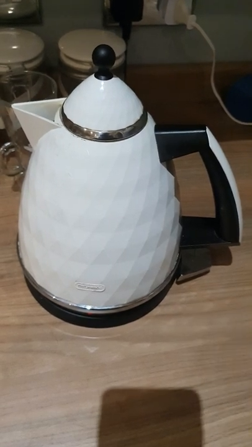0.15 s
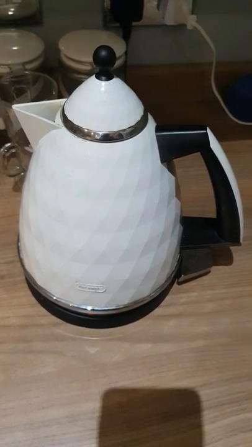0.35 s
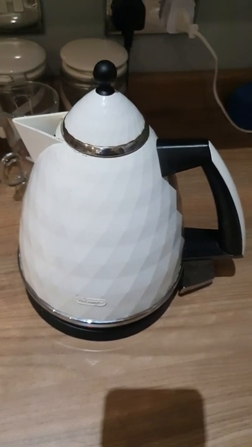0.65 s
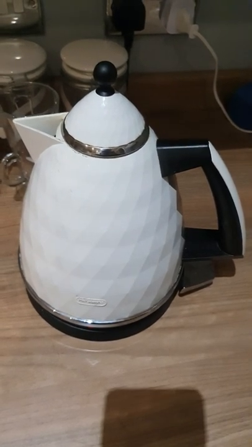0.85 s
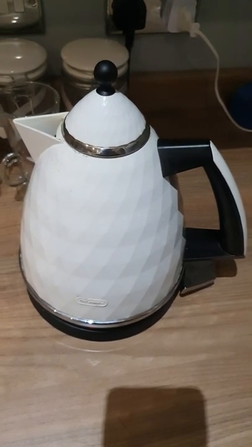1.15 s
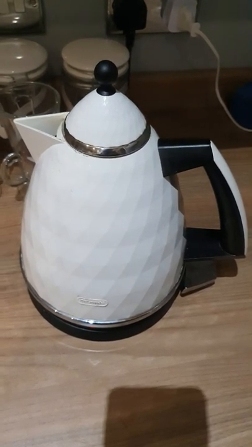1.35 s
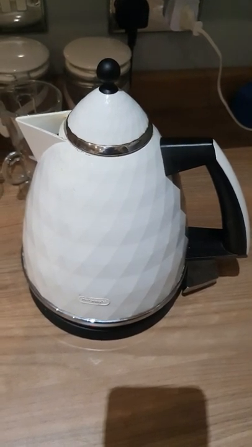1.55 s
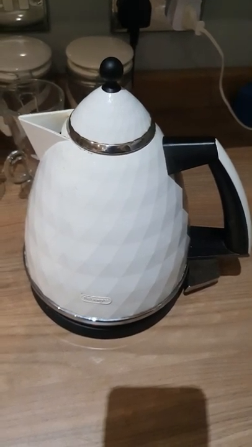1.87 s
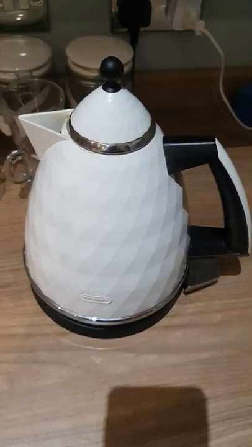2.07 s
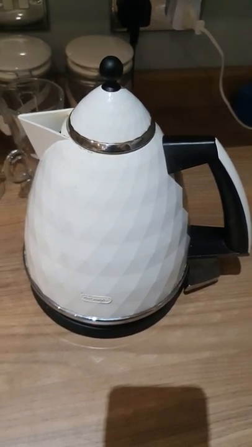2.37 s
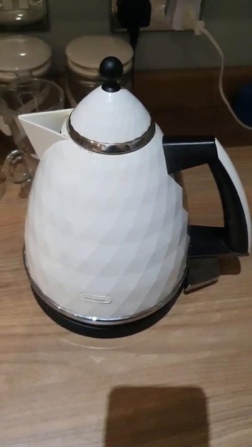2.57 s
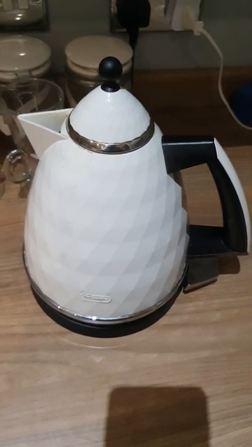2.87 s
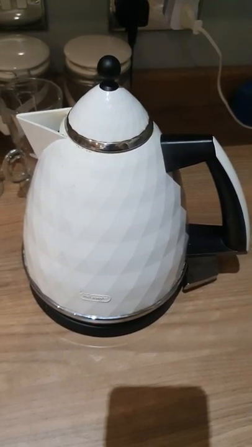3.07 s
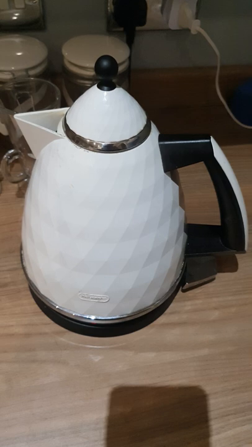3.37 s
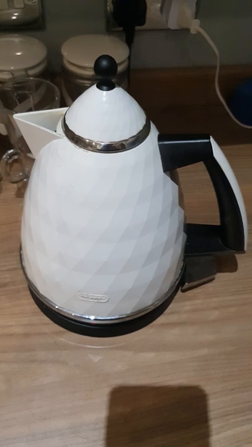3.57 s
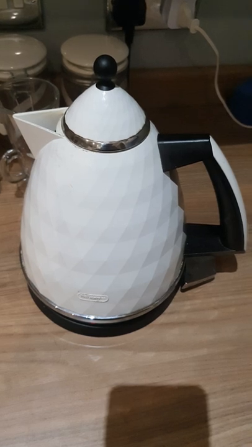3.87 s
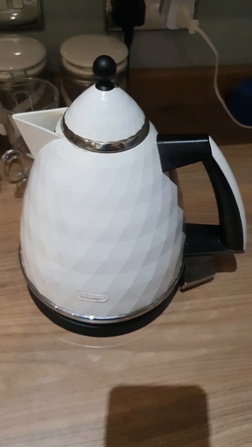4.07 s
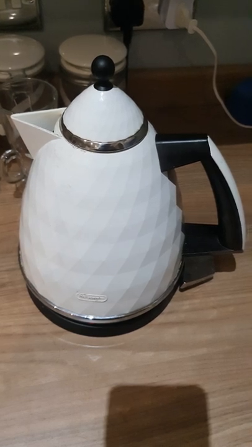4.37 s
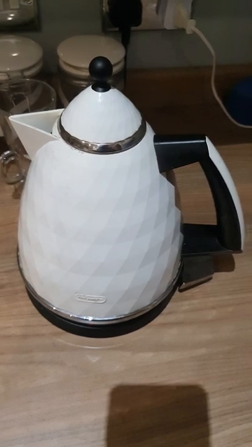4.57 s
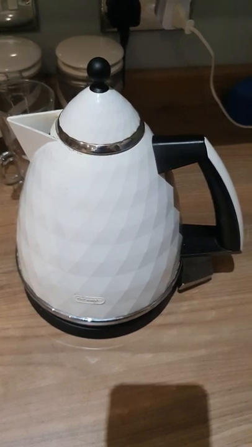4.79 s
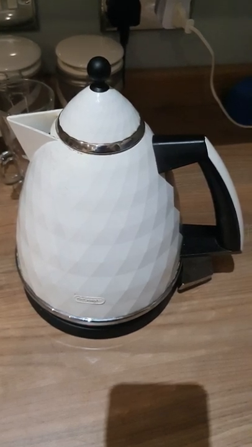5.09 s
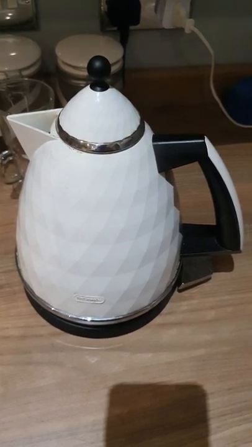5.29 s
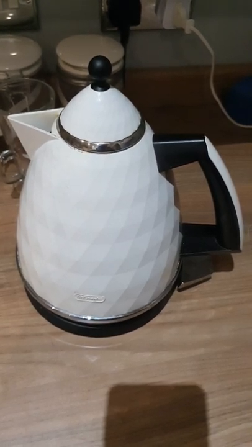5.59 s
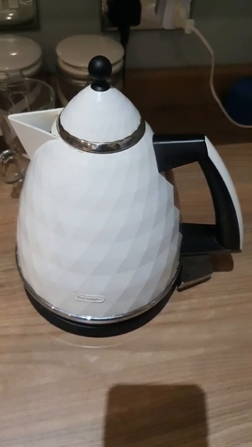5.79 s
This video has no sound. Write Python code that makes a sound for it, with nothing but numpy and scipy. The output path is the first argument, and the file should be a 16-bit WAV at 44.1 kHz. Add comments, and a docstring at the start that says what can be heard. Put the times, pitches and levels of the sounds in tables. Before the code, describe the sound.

An electric kettle warming water on a wooden counter, picked up very close by a phone, mostly centred and dry, lasting about six seconds. From 0 to 0.6 s the sound is thin and bright: a hissy, grainy rushing with little bass. At 0.62 s it switches abruptly, with a tiny dip, to a full, dark, muffled rumble that continues to the end. Its core is a wavering deep boom near 115 Hz, fluttering roughly and surging unevenly, with sudden drops around 1.2, 2.05, 3.2 and 5.15 s and strong bursts near 4.4 and 5.2 s. Above it sits a dense, hollow bubbling roar around 250 to 400 Hz, rising slightly near 5.5 s. Faint details lie far underneath: a soft breathy puff at 2.9 s, delicate fizz flurries, clearest near 2.9 and 4.4 s, and tiny high ticks between 2.2 and 5.4 s. It never reaches a full boil.

```python
"""Steam bubbles collapse on the hot base of an electric kettle: random impulses ring the modes of shell, water
and wooden counter, heard at the two ports of a phone held close above. One deep mode booms as a wavering sine.
Banded impulses make a fine fizz, swells of band noise make soft hisses, damped sines make ticks, and steady
noise is microphone hiss. After a moment the phone switches from a thin, bright colour to a full, dark one."""
import sys
import numpy as np
from scipy import signal
from scipy.fft import rfft, irfft, next_fast_len
from scipy.io import wavfile
from scipy.ndimage import uniform_filter1d

SR = 44100
rng = np.random.default_rng(int(sys.argv[2]) if len(sys.argv) > 2 else 0)


def put_to_file(sound):
    """Save the sound as 16-bit audio at rate SR, in the file named by the first command-line argument."""
    columns = np.atleast_2d(sound).T  # one column per channel
    safe = np.clip(columns, -1, 1)
    whole_steps = np.round(safe * 32767)
    wavfile.write(sys.argv[1], SR, whole_steps.astype(np.int16))


N = 261954
TIME_S = np.arange(N) / SR
SIZE = next_fast_len(N + SR // 2)  # padded FFT length
HZ = np.maximum(np.arange(SIZE // 2 + 1) * SR / SIZE, 1)


def undb(db):
    """Gain of a level in dB."""
    return 10 ** (np.asarray(db) / 20)


def level(x, db):
    """Scale to an rms level, taken over all channels together."""
    return x * undb(db) / np.sqrt(np.mean(x ** 2))


def along(hz, values):
    """Points joined on a log-frequency axis."""
    return np.interp(np.log(HZ), np.log(hz), values)


def over_time(table):
    """Points of a two-column table joined in time."""
    return np.interp(TIME_S, *np.transpose(table))


def colour(x, gain):
    """Weight the spectrum."""
    return irfft(rfft(x, SIZE) * gain, SIZE)[..., :N]


def sides(pan_db):
    """Left and right gains from left minus right in dB."""
    return undb(np.array([pan_db, -pan_db]) / 2)


def swell(middle_s, length_s, edge):
    """Bell in time; a higher edge exponent gives a flatter top and steeper flanks."""
    return np.exp(-np.abs(2 * (TIME_S - middle_s) / length_s) ** edge)


def walk(rate_hz):
    """Random levels held 1 / rate_hz and smoothed twice; unit spread."""
    hold = max(int(SR / rate_hz), 1)
    steps = rng.standard_normal(N)[np.arange(N) // hold]
    smooth = uniform_filter1d(uniform_filter1d(steps, hold), hold)
    return smooth / smooth.std()


def collapses(rate_hz, scatter_db):
    """Two unrelated swarms of bubble implosions at random instants, a few much stronger than the rest."""
    when, sign, size = rng.random((3, 2, N))
    strength = undb(-scatter_db * np.log(1 - size))
    return (when < rate_hz / SR) * np.sign(sign - .5) * strength


# microphone hiss spectrum: (frequency [Hz], relative level [dB], left minus right [dB])
HISS_SPECTRUM = [(5000, -10.5, 1.5), (8060, -6, -2), (9500, -3, 11.5), (10000, -3.5, 8), (11300, -1.5, 3.5),
                 (11900, -3.5, 0.5), (13500, -3, 1.5), (15700, -5, 0)]
HISS_RMS_DB = -76


def hiss():
    """Microphone noise: each port has its own smooth noise."""
    hz, db, pan_db = np.transpose(HISS_SPECTRUM)
    noise = rng.standard_normal((2, N)) * undb(.7 * walk(13))
    return level(colour(noise, undb(along(hz, db)) * sides(along(hz, pan_db))), HISS_RMS_DB)


# ticks of the warming shell: (time [s], starting level [dB], left minus right [dB])
SHELL_TICKS = [(2.2294, -52, -8), (2.4509, -58, -11), (3.1022, -58, -10), (3.3763, -61, 1),
               (3.4814, -62, 8), (3.707, -58, -3.0), (5.0804, -59, -1.5), (5.3792, -57, -6)]
TICK_HZ, TICK_T60_S, TICK_SAMPLES = 6400, .012, 2048


def ticks():
    """Each tick of the warming shell is a short, exponentially damped sine."""
    out = np.zeros((2, N + TICK_SAMPLES))
    t = np.arange(TICK_SAMPLES) / SR
    ring = undb(-60 * t / TICK_T60_S) * np.sin(2 * np.pi * TICK_HZ * t)
    for s, db, pan_db in SHELL_TICKS:
        start = int(s * SR)
        out[:, start:start + TICK_SAMPLES] += undb(db) * sides(pan_db)[:, None] * ring
    return out[:, :N]


# brief soft hisses, mostly on the right: (middle [s], length [s], centre [Hz], width [Hz],
# noise level before swell [dB], left minus right [dB])
SOFT_HISSES = [(2.9, 0.094, 1770, 1800, -50, -14), (2.964, .11, 12350, 4600, -75, -13),
               (4.439, .29, 4900, 900, -66.5, -13), (4.46, 0.27, 13600, 3200, -84, -8.5)]
PUFF_EDGE = 2.2


def puffs():
    """Each hiss is a soft, ragged swell of noise in one band."""
    out = 0
    for s, length_s, hz, width_hz, db, pan_db in SOFT_HISSES:
        band = 1 / (1 + (2 * (HZ - hz) / width_hz) ** 4)
        air = level(colour(rng.standard_normal((2, N)), band), db)
        ragged = undb(1.7 * walk(60)) * swell(s, length_s, PUFF_EDGE)
        out = out + air * ragged * sides(pan_db)[:, None]
    return out


# fizz spectrum: (frequency [Hz], relative level [dB])
FIZZ_SPECTRUM = [(3000, -23.5), (4200, -6.5), (4900, -3.5), (5600, -9), (6600, -2), (7100, -8),
                 (7800, -27.5), (9000, -39)]
# flurries of fizz: (middle [s], length [s], level [dB])
FIZZ_FLURRIES = [(.8, 0.44, -75), (1.73, .12, -71), (2.24, 0.065, -74), (2.577, 0.067, -69.5),
                 (2.73, .07, -71), (2.933, 0.19, -64), (3.1, 0.044, -67), (3.706, 0.061, -71),
                 (4.36, .14, -62), (4.5, .13, -60.5), (4.734, 0.094, -69), (5.083, .07, -70),
                 (5.39, .07, -74.5), (5.726, .1, -72.5)]
FIZZ_START_DB, FIZZ_FADE_DB_PER_S = -74.5, 3.5  # between flurries
FLURRY_EDGE, FIZZ_PAN_DB = 2.4, -5


def fizz():
    """The smallest bubbles fizz thinly and thin out as the water warms; short flurries of fizz rise above them."""
    spray = level(colour(collapses(12000, 1.5), undb(along(*np.transpose(FIZZ_SPECTRUM)))), 0)
    gain = undb(FIZZ_START_DB - FIZZ_FADE_DB_PER_S * TIME_S + 1.6 * walk(12))
    for s, length_s, db in FIZZ_FLURRIES:
        gain = gain + undb(db) * swell(s, length_s, FLURRY_EDGE)
    return spray * gain * undb(1.1 * walk(30)) * sides(FIZZ_PAN_DB)[:, None]


# deep mode of base and counter, long surges that collapse suddenly: (time [s], level [dB])
BOOM_LEVEL = [(0, -20.5), (.2, -28), (.3, -19), (.58, -27), (.7, -20), (.8, -30.5), (1.151, -20.5),
              (1.21, -32), (1.57, -20.5), (2.0, -22.5), (2.06, -42.5), (2.3, -27), (2.88, -21), (3.14, -22),
              (3.21, -34), (3.95, -24), (4.3, -33), (4.39, -17), (4.49, -33), (4.58, -20.5), (4.8, -21),
              (5.16, -47), (5.211, -18), (5.4, -30), (5.94, -24.5)]
BOOM_HZ, BOOM_WANDER_HZ, BOOM_STRAY_HZ_PER_DB, BOOM_JITTER_HZ = 115.77, 1.53, 0.15, 4.07
BOOM_FLUTTER, BOOM_CEILING = 0.83, 1.2  # random part of the push; size at which the push flattens out


def boom():
    """The swarm pushes the deep mode in and out of step, so it swells and wavers; weaker strays more."""
    db = over_time(BOOM_LEVEL)
    stray_hz = BOOM_WANDER_HZ + BOOM_STRAY_HZ_PER_DB * (db.max() - db)
    mode_hz = BOOM_HZ + stray_hz * walk(9) + BOOM_JITTER_HZ * walk(70)
    phase = 2 * np.pi * np.cumsum(mode_hz) / SR
    push = 1 + BOOM_FLUTTER * (walk(28) + 1j * walk(28))
    push = push / np.hypot(1, np.abs(push) / BOOM_CEILING)
    to_unit_rms = np.sqrt(2 / np.mean(np.abs(push) ** 2))
    return to_unit_rms * undb(db) * np.imag(push * np.exp(1j * phase))


# modes of shell, water and counter: (frequency [Hz], width [Hz], relative level [dB],
# left minus right [dB], unlikeness of ports [rad], right leads by [rad])
BODY_MODES = [(48.7, 35, -16.5, 0, 1.4, -0.7), (65.6, 38, -20.5, -1, .7, 0.3),
              (117.2, 36.7, -5.5, -2, .1, 0.1), (144.5, 37.4, -8, -1, .21, 0.23),
              (249.4, 40, -21, -4, 0.2, 0.46), (303.4, 24, -16.5, -3.5, 0.17, 0.04),
              (322, 18, -17.5, -6, 0.93, 1.5), (361.8, 29, -15.5, -2.5, 0.23, 0),
              (388.2, 32.7, -15, -3.5, 0.23, 0.5), (472.6, 93, -28.5, -5.5, .64, -0.3),
              (604, 94, -36, -2.5, 1.1, -0.9), (695, 75, -35, 0.5, 0.4, -1.5), (782, 63, -35, 0, 0.84, 0),
              (837, 95, -29.5, -5, 1.16, 2.1), (1045, 96, -34.5, -1.5, 1.18, -3),
              (1154, 75, -36.5, -7, 1.45, -2), (1257, 70, -39, -8, .95, -2.5),
              (1390, 35, -47.5, 3, 1.5, -2.15), (1480, 68, -45.5, 5.5, 1.1, -1),
              (1668, 160, -42.5, -3, 0.85, -1.34), (1978, 140, -46, 6, 1, -2.5),
              (2138, 140, -46, 8.5, 0.85, -1.5), (2332, 90, -46, 10, 1.4, 1), (2495, 95, -41, 5.5, 1, 1.1),
              (2750, 370, -49.5, 0.5, 1.37, -2), (3168, 66, -50, 6, 1.37, -3.5),
              (3497, 110, -53.5, 5, 1.37, -0.6), (4030, 170, -53, -2, 0.75, 2),
              (4350, 80, -62.5, -2, 0.91, -0.8), (4820, 150, -65, -1, 0.68, -1.5)]
# floor between the modes: (frequency [Hz], relative level [dB], left minus right [dB])
MODE_FLOOR = [(20, -60.5, -3), (40, -35, 0.5), (202, -31.5, 3), (600, -39.5, -2), (1210, -40.5, -1.5),
              (2380, -50, 7), (2670, -52.5, 5.5), (3300, -56.5, 2), (4470, -61, 0.5), (5500, -65, 1),
              (6700, -66, -1.5), (7700, -90, -2.5)]
# swarm strength as the water warms: (time [s], level [dB])
SWARM_HEAT = [(0, -3), (.6, 0.5), (1.2, 0.04), (2, -1), (2.6, -1), (3.3, -1), (4.2, -1.5), (5, -2),
              (5.94, -1)]
# hollow band of the air above the water: (time [s], level [dB])
HOLLOW_LEVEL = [(0, -32.5), (.7, -33), (1.17, -34), (1.3, -35), (4.6, -33.5), (5.15, -36), (5.3, -32.5),
                (5.52, -29), (5.6, -36), (5.94, -33.5)]
BODY_AND_HOLLOW_RMS_DB = -28.5  # full body and its hollow band, averaged together
HOLLOW_HZ, HOLLOW_WIDTH_HZ, HOLLOW_SURGE_DB = 350, 170, 1
PORTS_HZ = 250  # below this the ports feel nearly the same pressure


def body_power():
    """Power response at each port: every mode a steep-skirted resonance, plus the floor between."""
    hz, width_hz, db, pan_db, _, _ = np.transpose(BODY_MODES)
    gain = undb(db) * sides(pan_db * np.minimum(hz / PORTS_HZ, 1) ** 4)
    floor_hz, floor_db, floor_pan_db = np.transpose(MODE_FLOOR)
    power = (undb(along(floor_hz, floor_db)) * sides(along(floor_hz, floor_pan_db))) ** 2
    for k in range(len(hz)):
        # squared resonance keeps the valleys dark
        power = power + gain[:, k, None] ** 2 / (1 + (2 * (HZ - hz[k]) / width_hz[k]) ** 2) ** 2
    return power


def swarm_at_ports():
    """Swarm spectrum at both ports; the right mixes in a second swarm and a phase lead, by frequency."""
    heat_db = over_time(SWARM_HEAT) + 0.4 * walk(4.94) + .5 * walk(40)
    one, other = rfft(collapses(14000, 0.66) * undb(heat_db), SIZE)
    hz, _, _, _, unlike, lead = np.transpose(BODY_MODES)
    apart = np.minimum(HZ / PORTS_HZ, 1) ** 3
    unlike, lead = apart * along(hz, unlike), apart * along(hz, lead)
    right = np.cos(unlike) * np.exp(1j * lead) * one + np.sin(unlike) * other
    return np.array([one, right])


def rumble():
    """The swarm rings every mode; the hollow band is taken out and returned at its own moving level."""
    ringing = swarm_at_ports() * np.sqrt(body_power())
    band = 1 / (1 + (2 * (HZ - HOLLOW_HZ) / HOLLOW_WIDTH_HZ) ** 8)
    pair = irfft(np.array([ringing, ringing * band]), SIZE)[..., :N]
    body, hollow = level(pair, BODY_AND_HOLLOW_RMS_DB)
    hollow_db = over_time(HOLLOW_LEVEL) + HOLLOW_SURGE_DB * walk(8)
    return body - hollow + level(hollow, 0) * undb(hollow_db)


def scene():
    """Kettle and microphone noise at the two ports."""
    return hiss() + ticks() + puffs() + fizz() + boom() + rumble()


# thin first colour relative to the later one: (frequency [Hz], gain [dB], left minus right [dB])
THIN_COLOUR = [(30, -8, -11), (60, -6, 3), (118, -14.5, -1), (190, -11.5, 1.5), (293, 6, 0),
               (366, -0.5, -0.5), (504, 7, 2.5), (917, 9.5, -4), (1130, 16.5, 6.5), (1860, 16, -1.5),
               (3680, 18, 0.5), (5600, 19, 1), (5800, 27, 1), (6100, 20.5, -1), (6900, 19, 7),
               (7850, 24.5, 1.5), (15000, 23, 0)]
SWITCH_S, SWITCH_RAMP_S = .619, 0.0046
EDGE_S, LOW_CUT_HZ, TOP_HZ = .012, 46, 15750


def record(dry):
    """Thin colour stops dead, the full one starts low and ramps up; lows and top are cut, ends faded."""
    edge = np.clip(np.minimum(TIME_S, TIME_S[::-1]) / EDGE_S, 0, 1)
    dry = dry * np.sin(np.pi / 2 * edge) ** 2
    hz, db, pan_db = np.transpose(THIN_COLOUR)
    thin = colour(dry, undb(along(hz, db)) * sides(along(hz, pan_db)))
    full = dry * np.clip((TIME_S - SWITCH_S) / SWITCH_RAMP_S, .2, 1)
    both = np.where(TIME_S < SWITCH_S, thin, full)
    both = signal.sosfilt(signal.butter(3, LOW_CUT_HZ, "high", fs=SR, output="sos"), both)
    return signal.sosfilt(signal.ellip(10, .2, 60, TOP_HZ, fs=SR, output="sos"), both)


dry = scene()
out = record(dry)
put_to_file(out)
```